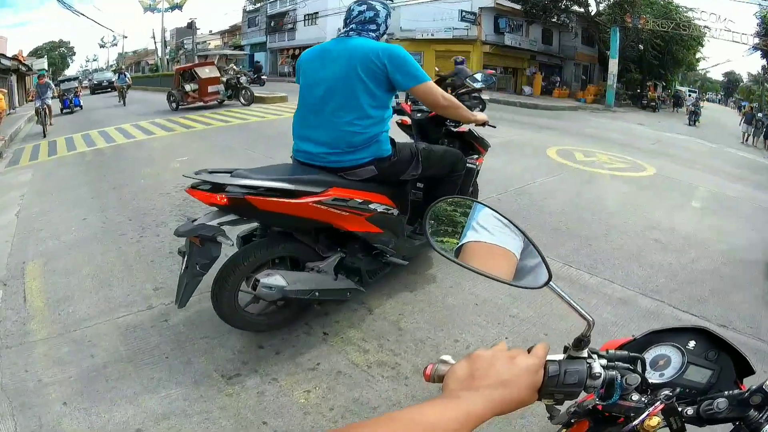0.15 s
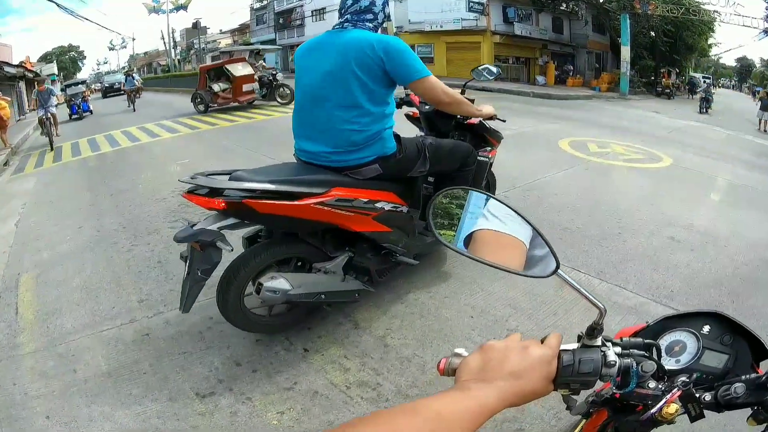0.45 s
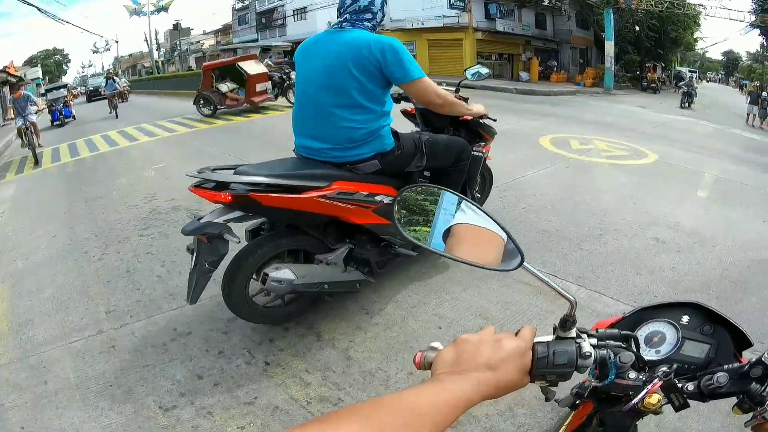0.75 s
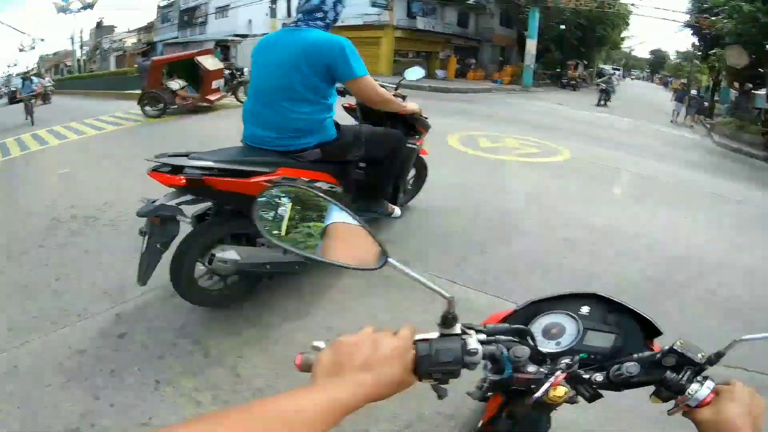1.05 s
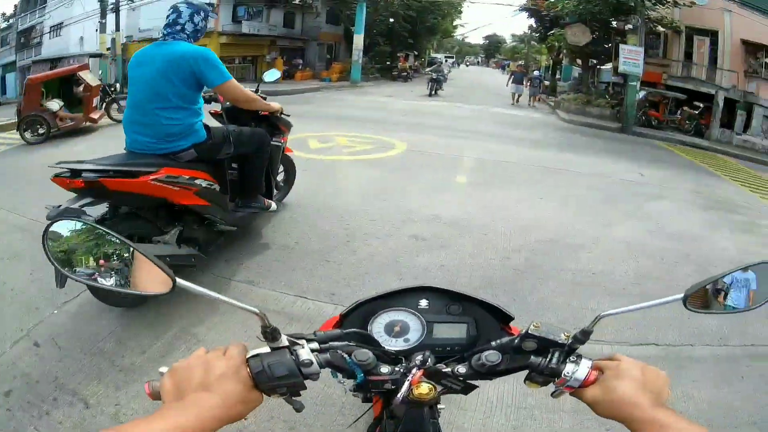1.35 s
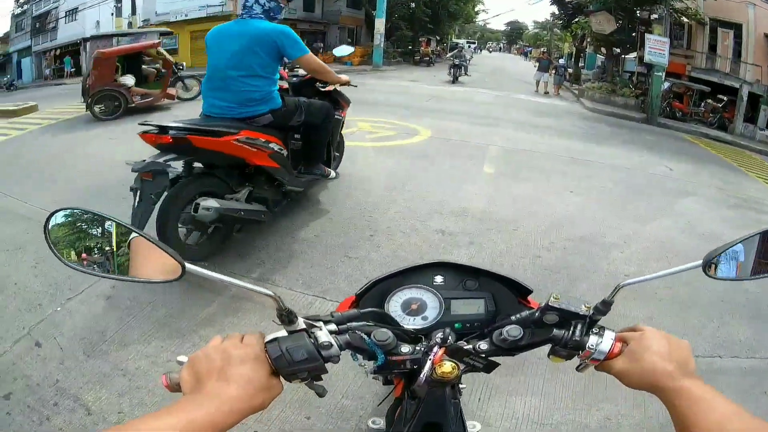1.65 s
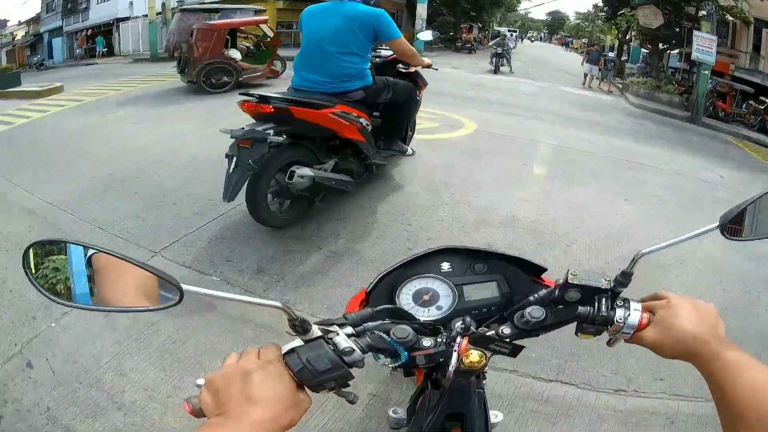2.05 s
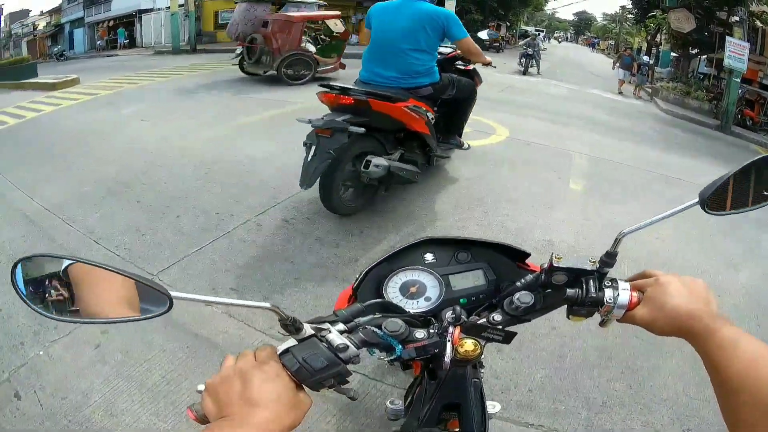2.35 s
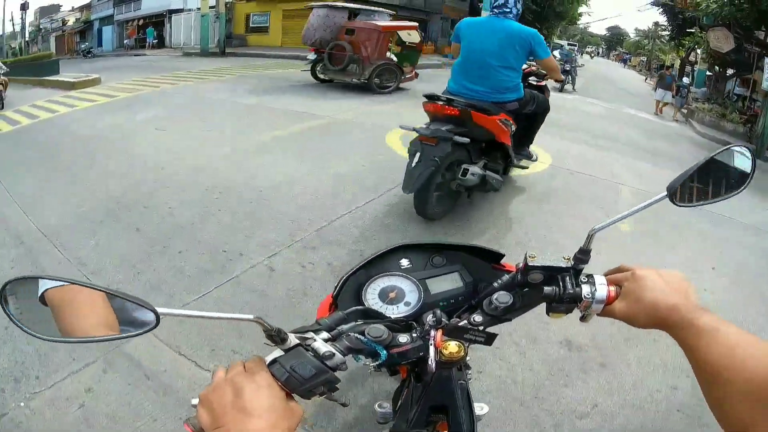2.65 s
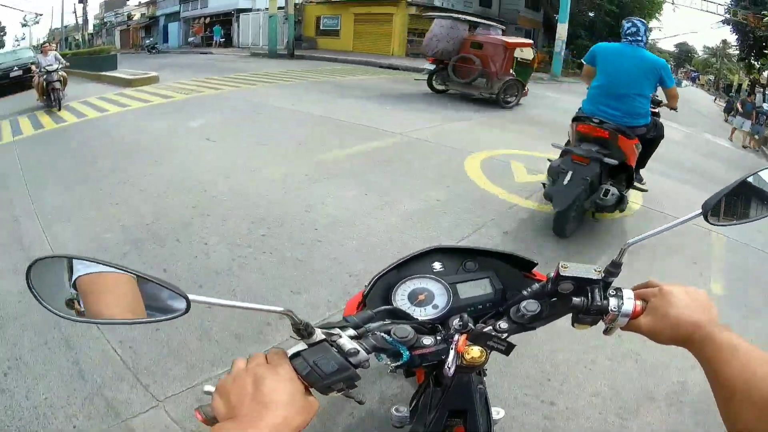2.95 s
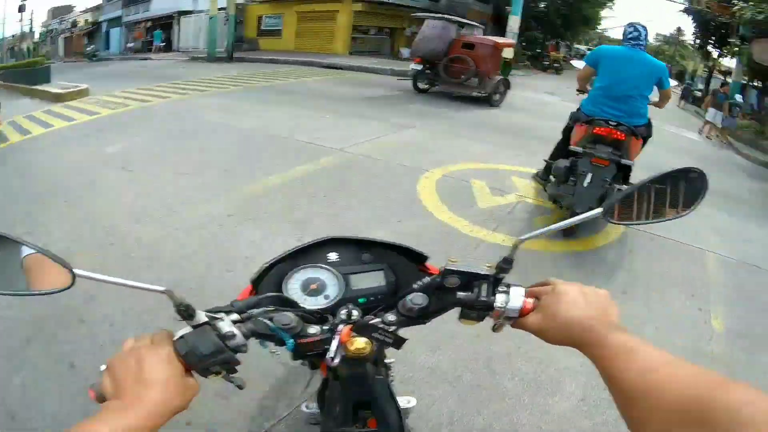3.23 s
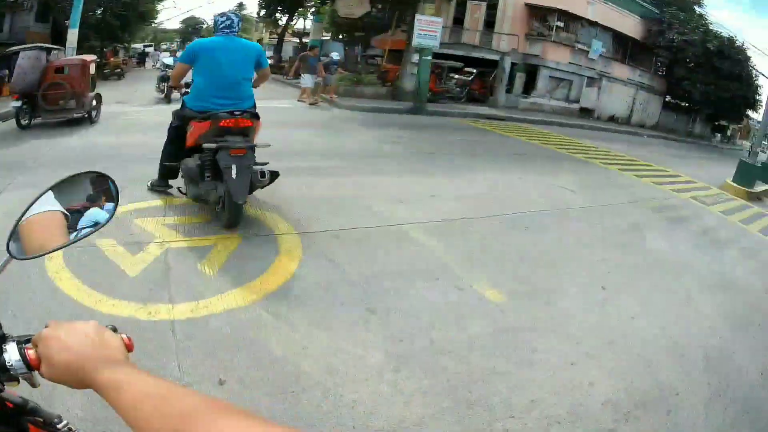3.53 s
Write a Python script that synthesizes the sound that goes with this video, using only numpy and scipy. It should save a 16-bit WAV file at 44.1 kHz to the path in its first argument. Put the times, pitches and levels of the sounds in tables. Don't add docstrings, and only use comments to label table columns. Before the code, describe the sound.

A motorcycle engine idles in low lumpy putts, then revs up into a fast steady putter.

```python
import sys
import numpy as np
from scipy import signal
from scipy.fft import rfft, irfft
from scipy.io import wavfile
from scipy.ndimage import uniform_filter1d

SR = 44100
rng = np.random.default_rng(int(sys.argv[2]) if len(sys.argv) > 2 else 0)


def how_loud(loudness_db):
    steps = np.asarray(loudness_db, float) / 20
    return 10 ** steps


def pcm_store(signal):
    levels = np.round(np.clip(np.atleast_2d(signal), -1, 1) * 32767)
    wavfile.write(sys.argv[1], SR, levels.astype(np.int16).T)


N = 162729

# t/s, valve hiss level/dB, intake level/dB
THROTTLE_FLOW = [(0, -71, -23), (.15, -77, -31), (.5, -90, -36), (.8, -81, -41), (1.08, -61, -33),
                 (1.17, -46, -31), (1.28, -47.5, -18), (1.4, -45, -44), (1.9, -46.5, -46), (2.45, -58, -55),
                 (2.65, -45.5, -36.5), (3.35, -48, -37), (3.69, -43, -48)]


def evened(x):
    return x / np.sqrt(np.mean(x ** 2) + 1e-20)


def curve(table, column=1):
    rows = np.array(table)
    return np.interp(np.arange(N) / SR, rows[:, 0], rows[:, column])


def late(x, s):
    samples = np.arange(len(x))
    return np.interp(samples - s * SR, samples, x, left=0)


def ring(t, hz, width, arrival_ms, strength):
    u = np.maximum(t - arrival_ms / 1000, 0)
    return strength * np.sin(2 * np.pi * hz * u) * np.exp(-np.pi * width * u)


def resonate(x, hz, width):
    turn = np.exp(2j * np.pi * hz * np.arange(len(x)) / SR)
    r = np.exp(-np.pi * width / SR)
    envelope = signal.lfilter([1 - r], [1, -r], x / turn + 1e-18)
    return 2 * (turn * envelope).real


def slow(hz):
    spectrum = rfft(rng.standard_normal(N))
    return evened(irfft(spectrum * np.exp(-(np.fft.rfftfreq(N, 1 / SR) / hz) ** 2), N))


def noise(points, patchy_db, size=1024):
    frames, hz = 4 * N // size + 5, np.fft.rfftfreq(size, 1 / SR)
    a, b, patches = rng.standard_normal((frames, len(hz), 3)).T
    for axis in (0, 1):
        patches = uniform_filter1d(patches, size=8192 // size, axis=axis)
    patches = evened(patches)
    f, db = np.transpose(points)
    shape = np.interp(np.log(hz + 1), np.log(f + 1), db, left=-40, right=-80)[:, None]
    spectrum = (a + 1j * b) * how_loud(shape + patchy_db * patches)
    return evened(signal.istft(spectrum, nperseg=size, noverlap=size * 3 // 4)[1][:N])


def coloured(peaks):
    air = rng.standard_normal(N)
    return evened(sum(how_loud(db) * resonate(resonate(air, f, w), f, w) for f, w, db in peaks))


def gate(turns, at, span):
    return np.exp(-(((turns - at + .5) % 1 - .5) / span) ** 4)


def street():
    # f/Hz, spectral level/dB per Hz
    wash = [(60, -16), (110, -2.5), (250, -7.5), (620, -16.5), (1050, -14), (2000, -27), (9000, -46),
            (15000, -66)]
    # t/s, level/dB; it dips around 0.6 s
    wash_level = [(0.0, -33.5), (0.46, -44.5), (0.63, -48.5), (0.81, -40), (0.95, -42.5), (1.24, -38.5),
                  (1.77, -42), (3.29, -45.5), (3.5, -42.5), (3.69, -38.5)]
    return noise(wash, patchy_db=2.5) * how_loud(curve(wash_level) + 12 + 0.37 * slow(6.6))


def wind():
    # f/Hz, spectral level/dB per Hz
    turbulence = [(15, -32.5), (30, 5.5), (45, -1.5), (68, 0.5), (100, -9), (170, -15), (300, -43)]
    # t/s, level/dB
    gusts = [(0, -39), (.1, -11), (.47, -9.5), (.52, -19.5), (.57, -7.5), (.71, -7), (.76, -42), (.83, -21),
             (.87, 1), (.93, -14), (.97, -35.5), (1.25, -27.5), (1.7, -37.5), (2.0, -19.5), (2.3, -16.5),
             (2.65, -25), (2.8, -34.5), (3.69, -31.5)]
    lumps_db = 5 * np.tanh(slow(20))
    return noise(turbulence, patchy_db=3, size=4096) * how_loud(curve(gusts) + lumps_db)


def scooter():
    # t/s, peak level/dB, f/Hz
    ticks = [(0.0403, -40, 10300), (0.0952, -26.5, 9950), (0.1526, -32.5, 9860), (0.2082, -31, 10240),
             (0.2643, -32, 9700), (0.32, -23, 10580), (0.375, -26, 10150), (0.4309, -34.5, 10240),
             (0.485, -42, 9800), (0.5383, -35, 9960), (0.595, -44, 9400), (0.6479, -38.5, 9960),
             (0.7022, -38, 10500), (0.7558, -35.5, 9800), (0.8086, -34, 10030), (0.86, -34, 10030),
             (0.914, -38.5, 10300), (0.9646, -38.5, 10600), (1.0216, -36, 10300), (1.069, -33, 9700),
             (1.1177, -35.5, 10200), (1.1693, -31, 10100), (1.2266, -35.5, 10400), (1.2715, -36.5, 9700),
             (2.4199, -45, 9900), (2.4698, -49, 9800), (2.515, -42.5, 9300), (2.5635, -42, 9400),
             (2.609, -37, 10300)]
    # t/s, level/dB
    belt = [(0, -70), (.6, -80), (1.2, -62), (1.5, -74), (1.75, -55), (2.0, -65), (2.35, -59), (2.65, -82),
            (3.69, -86)]
    t, out = np.arange(1500) / SR, np.zeros(N + 1500)
    grit = rng.standard_normal((len(ticks), 1500))
    for (s, db, hz), g in zip(ticks, grit):
        tone = np.sin(2 * np.pi * hz * t) * how_loud(-60 * t / .025) * np.minimum(t / 0.0014, 1)
        rattle = how_loud(-7 - 60 * t / .05) * evened(resonate(g, hz, 640))
        snap = how_loud(-12 - 60 * t / 0.017) * evened(resonate(g, 0.55 * hz, 6000))
        out[round(s * SR):][:1500] += how_loud(db) * (tone + rattle + snap)
    whir_hz, whir_width_hz = 10300, 690
    whir = rng.standard_normal(N)
    for _ in range(2):
        whir = resonate(whir, whir_hz, whir_width_hz)
    flutter_db = 4.4 * np.cos(2 * np.pi * 20 * np.arange(N) / SR)
    return out[:N] + evened(whir) * how_loud(curve(belt) + 1.8 * slow(40) + flutter_db)


def intake(turns):
    # f/Hz, bandwidth/Hz, level/dB
    duct = [(1084, 414, 10.5), (1510, 1000, -14), (2470, 1120, -10), (4900, 2100, -23)]
    gulp_db = curve(THROTTLE_FLOW, column=2) + 2 * slow(22)
    return coloured(duct) * gate(turns, at=0.93, span=0.18) * how_loud(gulp_db)


def valves(turns):
    # f/Hz, bandwidth/Hz, level/dB
    jet = [(4700, 250, -7), (5900, 500, -8), (7550, 900, 0), (9100, 400, -11), (11300, 1500, -13),
           (13400, 1600, -9)]
    hiss_db = curve(THROTTLE_FLOW) + 1.2 * slow(6.8)
    return coloured(jet) * gate(turns, at=0.4, span=.24) * how_loud(hiss_db)


def clatter(turns, level_db):
    # f/Hz, bandwidth/Hz, level/dB
    casing = [(1343, 110, -2), (1830, 37, 5.5), (2278, 58, -2.5), (2484, 280, -8.5), (3160, 100, -15)]
    return coloured(casing) * gate(turns, at=0.28, span=0.12) * how_loud(-23.5 + level_db)


def muffler(t, heat, upper_db):
    # delay t/s, share of the blow
    reflections = [
        (.00229, .57),
        (.00638, .33),
        (.0106, .07),
    ]
    # f/Hz, bandwidth/Hz, arrival t/ms, strength
    can_modes = [(199, 60, -.83, -.3), (366, 26, .6, .22), (393, 55, -.58, .24)]
    # f/Hz, bandwidth/Hz, arrival t/ms, strength
    shell_modes = [(1095, 150, 4.33, -.18), (953, 42, 4.27, .08), (1190, 45, 5.2, .03)]
    # f/Hz, bandwidth/Hz, arrival t/ms, strength
    cold_modes = [(183, 16, 0, 0.18), (290, 18, 0, 0.11), (433, 19, 0, 0.13)]
    blow_s, rebound_s = .00036, .00095
    blow = .32 * np.exp(-(t / rebound_s) ** 2 / 2) - np.exp(-(t / blow_s) ** 2 / 2)
    for s, share in reflections:
        blow = blow + share * late(blow, s)
    boom = ring(t, 99, 16, -.3, .13) * how_loud(2.5 * max(heat, 0))
    can = sum(ring(t, *mode) for mode in can_modes) * how_loud(1 * heat)
    shell = sum(ring(t, *mode) for mode in shell_modes)
    shell = shell + ring(t, 822 + 49.3 * heat, 85, 4.97, .28)
    shell = shell + 0.13 * late(shell, reflections[2][0])
    putt = blow + boom + can + shell * how_loud(upper_db)
    cold = max(-heat, 0)
    putt = putt + cold * sum(ring(t, *mode) for mode in cold_modes)
    putt = putt * how_loud(9.5 * cold)
    blur_s = 0.000088 + 0.00071 * cold
    blur = np.exp(-(np.arange(-100, 101) / SR / blur_s) ** 2 / 2)
    return np.convolve(putt, blur / blur.sum(), "same")


def exhaust(turns, level, heat, upper_db):
    lead, out = 200, np.zeros(N + 5000)
    t = (np.arange(4000) - lead) / SR
    spread = rng.standard_normal((N, 2))
    for k in np.flatnonzero(np.diff(np.floor(turns))):
        putt = muffler(t, heat[k] + 0.073 * spread[k, 1], upper_db[k])
        out[k:k + len(t)] += how_loud(level[k] + 16 + 0.62 * spread[k, 0]) * putt
    return out[lead:N + lead]


def engine():
    # t/s, firing rate f/Hz, blow level/dB
    running = [(0.0, 11.623, -15.1), (0.397, 10.986, -22.5), (0.398, 10.211, -31.9), (0.66, 11.794, -23.5),
               (0.946, 11.331, -21.1), (1.065, 9.854, -35.6), (1.117, 8.326, -20.9), (1.24, 13.109, -13.3),
               (1.47, 22.689, -14.6), (1.735, 24.251, -14.5), (1.994, 23.363, -16.0),
               (2.408, 23.287, -17.6), (2.546, 22.57, -17.8), (2.756, 23.705, -16.2),
               (3.039, 23.252, -18.1), (3.24, 23.932, -17.8), (3.39, 24.052, -17.8), (3.69, 25.564, -18.5)]
    # t/s, heat (0 neutral, below 0 cold), upper mode level/dB
    gas = [
        (0, -0.38, -2),
        (1.15, -0.66, 1.5),
        (1.3, -0.33, 1.5),
        (1.6, 0.45, -0.5),
        (3.0, 0.14, 1.7),
        (3.3, 0.43, 2),
        (3.55, 0.73, 6.5),
        (3.69, 0.47, 6.5),
    ]
    turns = -.494 + np.cumsum(curve(running)) / SR
    level = curve(running, column=2)
    heat, upper_db = curve(gas), curve(gas, column=2)
    firings = exhaust(turns, level, heat, upper_db)
    return firings + clatter(turns, level + upper_db) + valves(turns) + intake(turns)


def scene():
    return (street() + wind() + scooter() + engine())[None]


def band_limit(x):
    return signal.sosfilt(signal.butter(12, 15170, fs=SR, output="sos"), x)


def record(dry):
    ceiling = 0.76
    limited = ceiling * np.tanh(dry / ceiling)
    edge = signal.firwin(101, 14900, fs=SR)[None]
    mix = signal.oaconvolve(limited, edge, "same")
    return band_limit(mix)


dry = scene()
out = record(dry)
pcm_store(out)
```